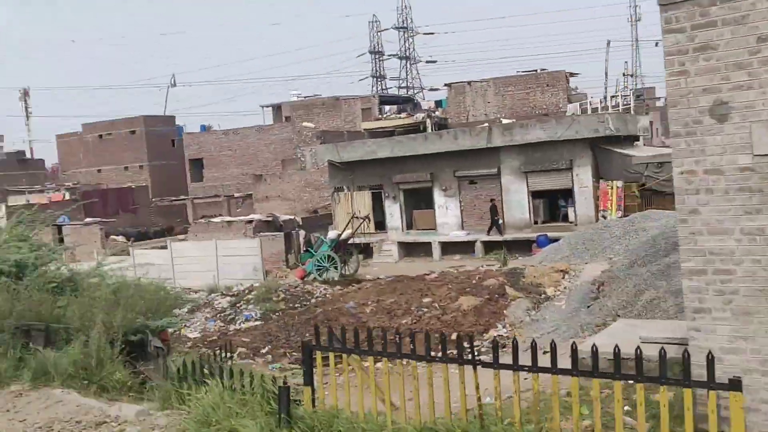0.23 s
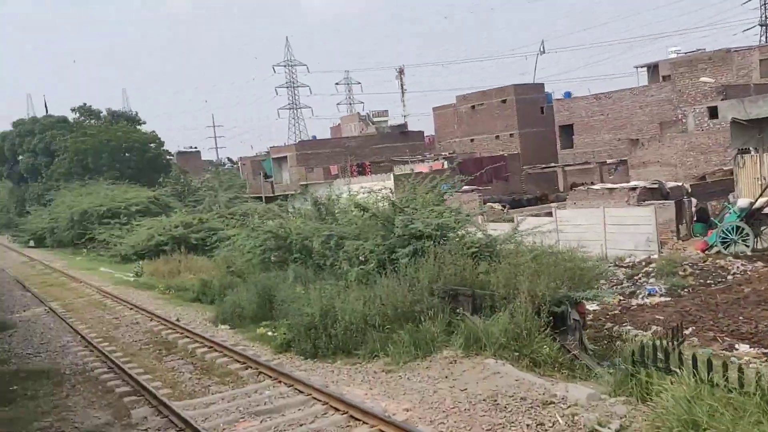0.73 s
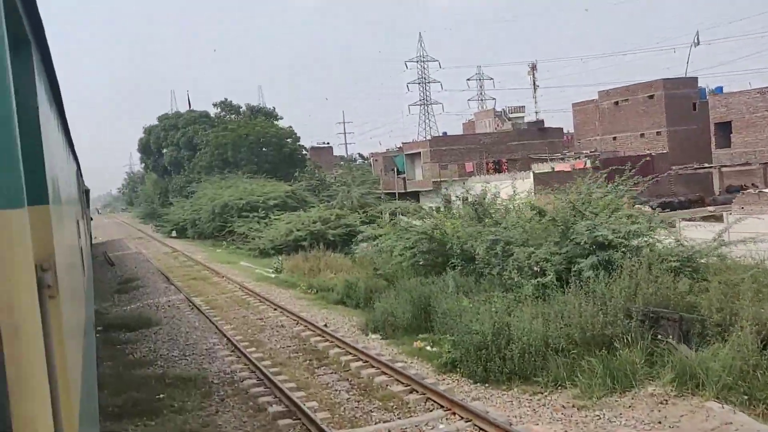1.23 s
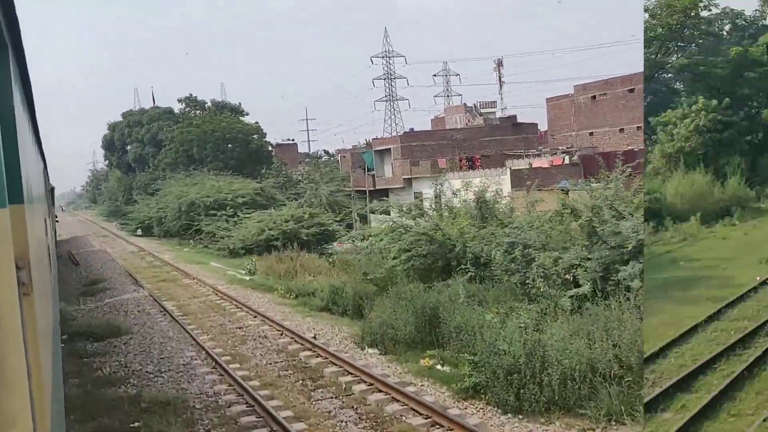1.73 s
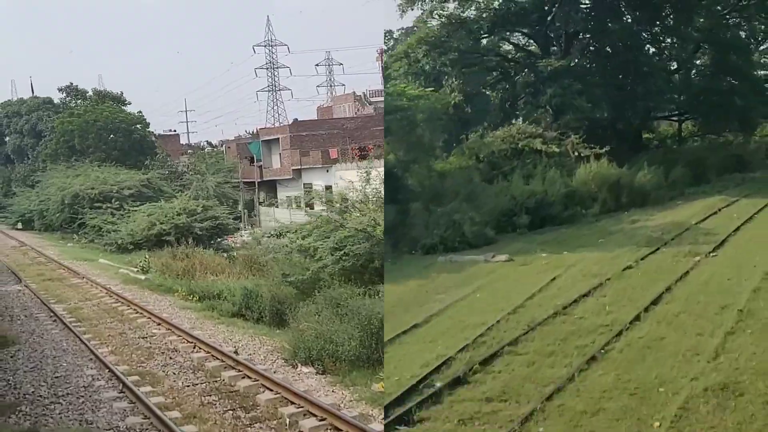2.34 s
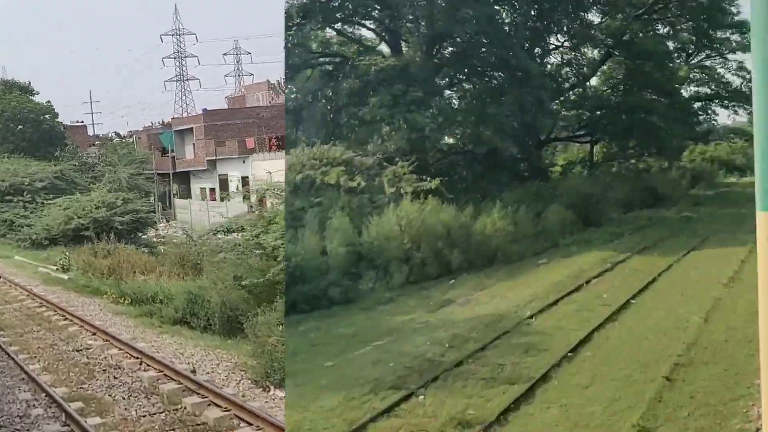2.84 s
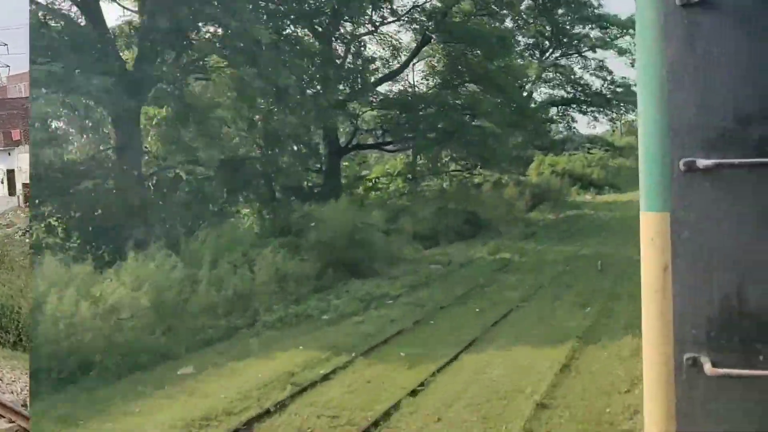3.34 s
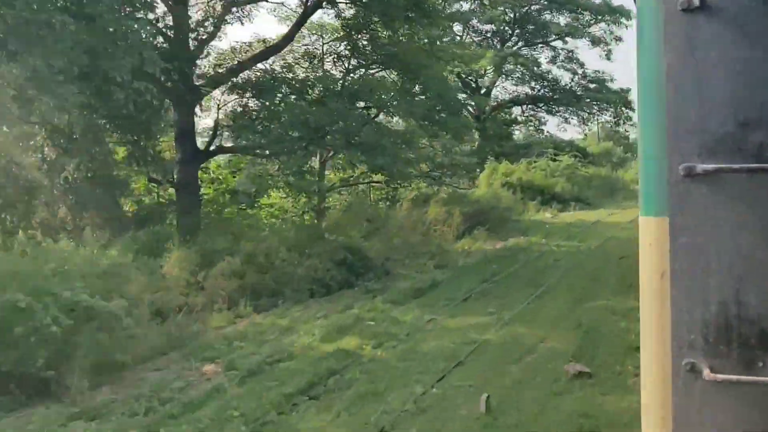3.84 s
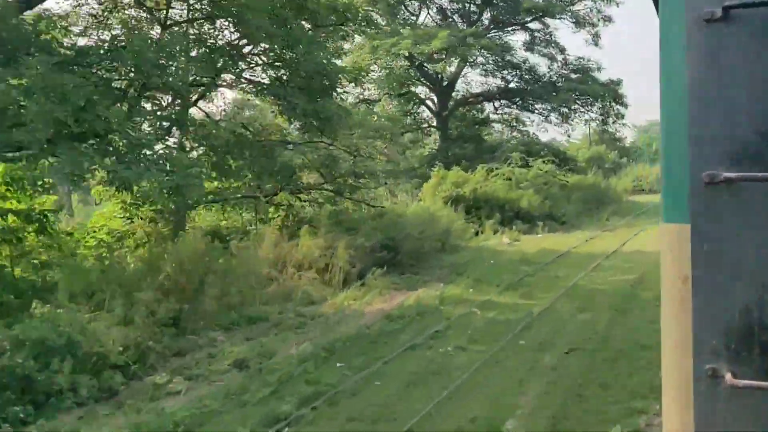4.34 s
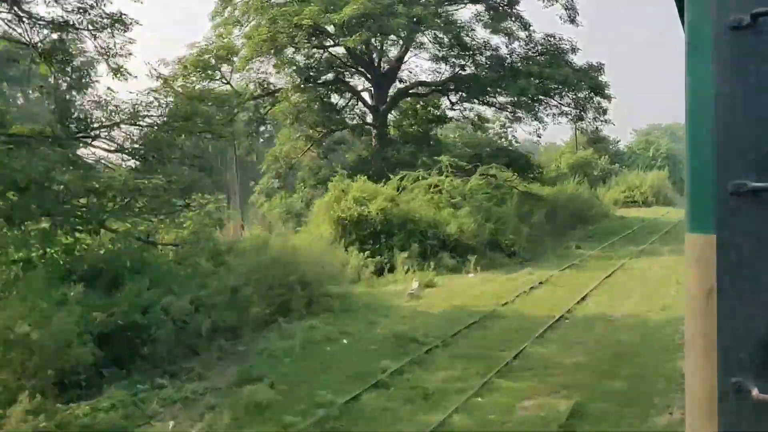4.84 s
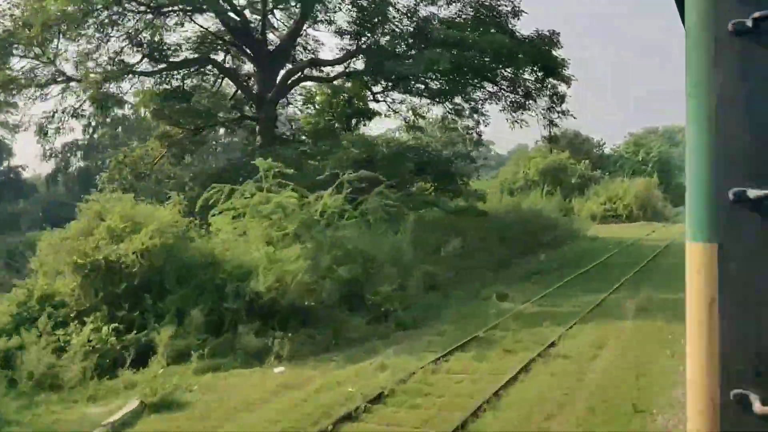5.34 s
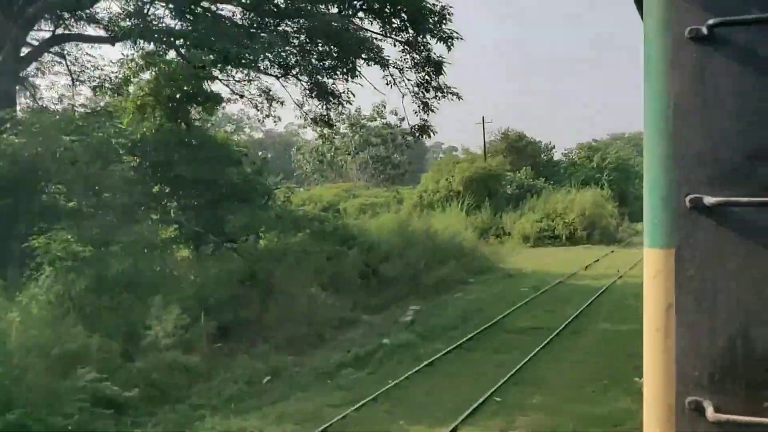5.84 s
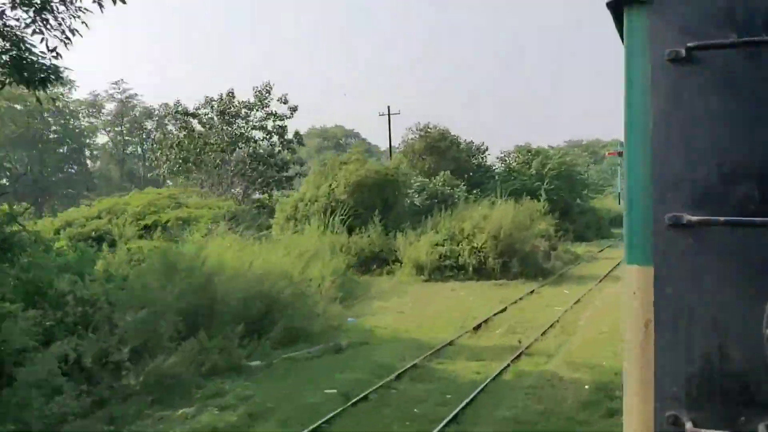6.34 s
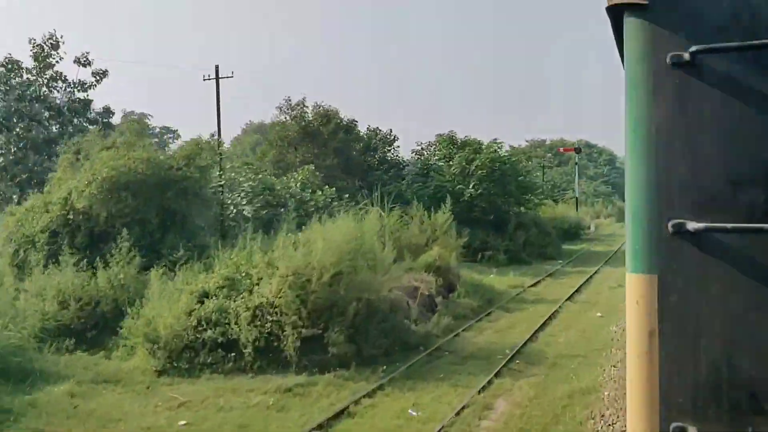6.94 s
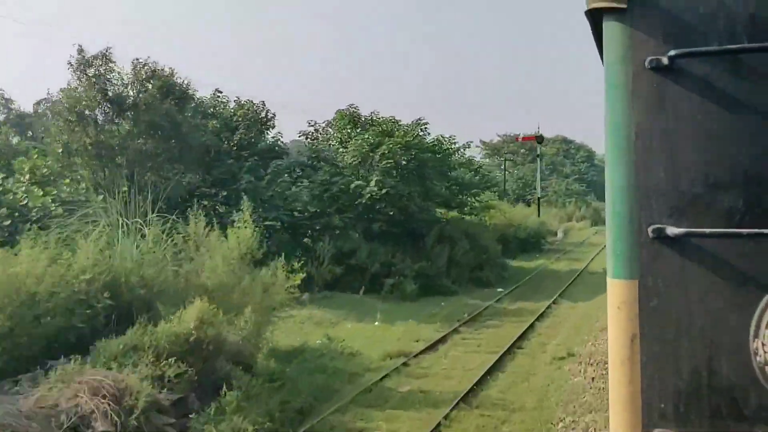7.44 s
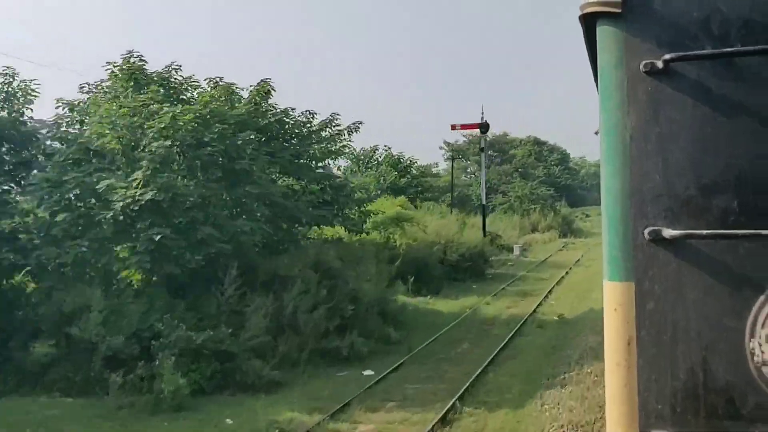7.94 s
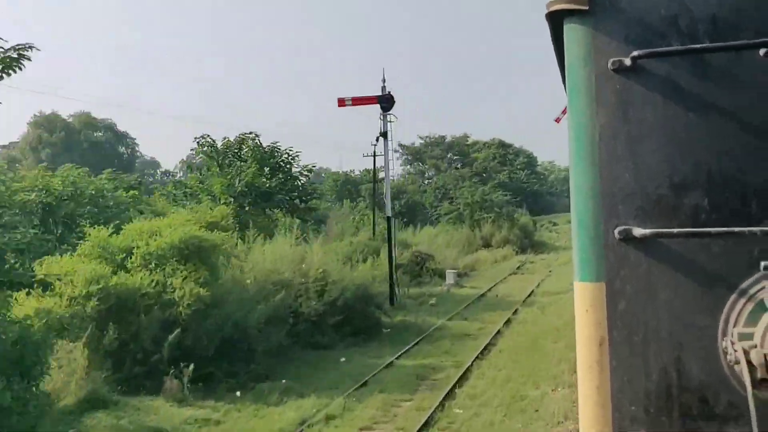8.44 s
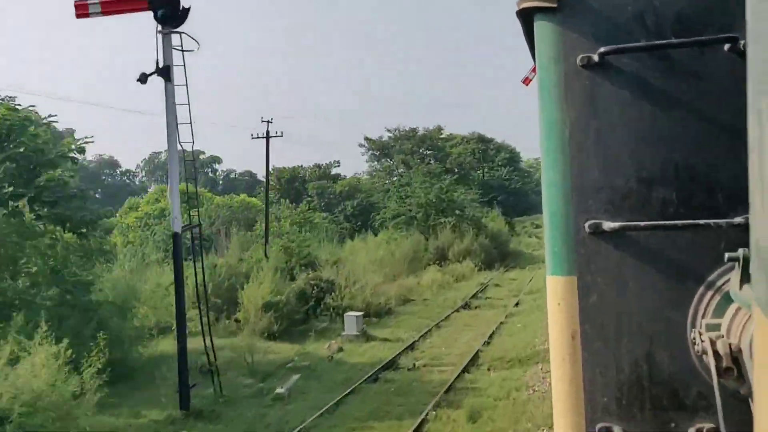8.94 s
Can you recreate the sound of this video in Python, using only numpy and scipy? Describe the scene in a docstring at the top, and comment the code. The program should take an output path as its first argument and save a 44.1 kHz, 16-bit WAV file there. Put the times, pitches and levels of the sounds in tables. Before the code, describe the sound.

Train wheels rumble steadily on rails, with brief rail squeals and a cluster of loose metal clanks between one and two seconds. Then the microphone leaves the shelter of the coach and wind batters it until the end, thumping, fluttering and crackling, strongest on the left side, while airy gusts hiss around the door edge. Outdoors, close and raw stereo.

```python
"""At the open doorway of a moving passenger coach, a microphone with two ports in the draught.
Wheels roar on the rails, the running gear clanks and a flange squeaks: noise, struck modes, fuzzy tones.
Then the slipstream takes over: separate noises rumble, flutter, slap and tick on the ports,
and a hiss follows the gusts that tear round the edge of the door."""
import sys
import numpy as np
from scipy import signal
from scipy.fft import rfft, irfft, next_fast_len
from scipy.io import wavfile
from scipy.ndimage import uniform_filter1d

SR = 44100
rng = np.random.default_rng(int(sys.argv[2]) if len(sys.argv) > 2 else 0)


def transcribe(signal):
    """Save signal, clipped to [-1, 1], as a 16-bit WAV file at the path in sys.argv[1]."""
    frames = np.atleast_2d(signal).T
    limited = np.clip(frames, -1, 1)
    pcm = np.round(limited * 32767).astype(np.int16)
    wavfile.write(sys.argv[1], SR, pcm)


N = 404838
TIME = np.arange(N) / SR


def gain_of(db):
    """Decibels to amplitude."""
    return 10 ** (np.asarray(db) / 20)


def evened(x):
    """Scales to rms 1 over all of x."""
    return x / np.sqrt(np.mean(x ** 2) + 1e-20)


def read(points, hz):
    """A spectrum joined by straight lines on a log-frequency axis."""
    f, value = np.transpose(points)
    return np.interp(np.log(hz + 1), np.log(f + 1), value)


def follow(rows, t):
    """Each column of a curve table at the times t."""
    s, *columns = np.transpose(rows)
    return np.array([np.interp(t, s, c) for c in columns])


def add(mix, s, sound):
    """Mixes a sound in at time s."""
    part = mix[:, max(round(s * SR), 0):][:, :sound.shape[-1]]
    part += sound[..., :part.shape[1]]


def coloured(x, points):
    """Filters by a spectrum."""
    size = next_fast_len(x.shape[-1] + 2048)
    gain = gain_of(read(points, np.fft.rfftfreq(size, 1 / SR)))
    return irfft(rfft(x, size) * gain, size)[..., :x.shape[-1]]


def noise(points, size=N):
    """Two unrelated noises of one colour, together of rms 1."""
    return evened(coloured(rng.standard_normal((2, size)), points))


def wander(rate_hz, t=TIME):
    """Two smooth random curves at the times t, cut from 10 s of rms 1, that move mostly below the rate."""
    grid = np.arange(20000) / 2000
    hz = np.fft.rfftfreq(len(grid), grid[1])
    spectrum = rfft(rng.standard_normal((2, len(grid)))) * np.exp(-(hz / rate_hz) ** 2)
    curves = evened(irfft(spectrum))
    return np.array([np.interp(t, grid, c) for c in curves])


def steadied(x, size):
    """Holds the rms near 1 over stretches of size samples."""
    power = uniform_filter1d(uniform_filter1d(x ** 2, size), size)
    return x / np.sqrt(power + 1e-12)


def singing(hz, width, t=TIME):
    """A resonance driven by roughness: a fuzzy tone, rms near 1, on each port."""
    angle = 2 * np.pi * np.cumsum(hz * np.ones(len(t))) / SR
    return wander(width / 2, t) * np.cos(angle) + wander(width / 2, t) * np.sin(angle)


# wheels rolling on the rails, before the sway and port trim: (time [s], level [dB])
ROLLING = [(0, -23.5), (.3, -22.5), (.7, -24.5), (1.1, -22), (1.45, -22.5), (1.85, -25.5), (2.15, -27.5),
           (2.5, -28), (2.8, -34), (9.18, -29.5)]
# spectrum of the roar, before its split into direct and diffuse: (frequency [Hz], level [dB per Hz])
ROLLING_COLOUR = [(30, 13.5), (100, 13), (310, 4.5), (500, -2), (620, -1), (790, -1), (1000, -5),
                  (1300, -6), (1900, -10.5), (2800, -12), (4000, -18.5), (5200, -16), (14000, -27.5)]
# resonances that the rolling keeps humming: (frequency [Hz], width [Hz], level against the roar [dB])
DRONES = [(76.6, 14, -8), (120.1, 34, -7.5), (300, 27, -18), (1940, 150, -22.5)]


def rolling():
    """Rough wheels on rough rails: the low roar reaches both ports nearly alike, the treble from all round."""
    diffuse = coloured(noise(ROLLING_COLOUR), [(700, -6.0), (1000, 0.88)])
    direct = coloured(noise(ROLLING_COLOUR)[0], [(700, 1.5), (1000, -7.5)])
    direct += sum(gain_of(db) * singing(hz, width)[0] for hz, width, db in DRONES)
    # the direct sound reaches the right port six samples late, some 5 cm of air
    ports = np.array([direct, np.roll(direct, 6)])
    port_trim_db = np.array([[-1.1], [1.0]])
    level_db = follow(ROLLING, TIME) + 0.89 * wander(35)[0] + port_trim_db
    return (diffuse + ports) * gain_of(level_db)


# wheels singing against the rail:
# (time [s], length [s], pitch [Hz], glide [Hz], roughness [0-1], level before a 2.5 dB cut [dB])
SQUEAKS = [(0, .2, 2130, 60, .8, -39.5), (.14, .38, 2270, -130, .9, -37), (.58, .38, 5130, 60, .3, -47),
           (.75, .65, 718, -12, .5, -40), (1.325, .04, 3110, 0, .15, -40), (1.335, .1, 705, 0, .2, -31.5),
           (1.333, .1, 6290, -50, .25, -39), (1.395, .045, 3170, 0, .1, -40), (1.45, .8, 700, 15, .5, -41),
           (1.735, .04, 12600, 0, .3, -35), (1.775, .042, 8700, 0, .6, -36),
           (1.894, .04, 8720, 0, .2, -33.5), (1.915, .115, 8670, -130, .35, -36),
           (2.1, .06, 8480, 0, .3, -42), (2.262, .07, 8560, -30, .35, -40), (2.02, .6, 8560, 0, .7, -51)]
SQUEAK_WAVER, SQUEAK_WAVER_HZ = .004, 45  # the pitch trembles by this rms share, at up to about this rate


def squeaks():
    """Stick and slip sets a wheel mode singing: a gliding, trembling tone with a skirt of scraping."""
    out = np.zeros((2, N))
    for s, length, hz, glide_hz, rough, db in SQUEAKS:
        t = np.arange(0, length, 1 / SR)
        pitch = hz * (1 + SQUEAK_WAVER * wander(SQUEAK_WAVER_HZ, t)[0]) + glide_hz * t / length
        clean = evened(np.sin(2 * np.pi * np.cumsum(pitch) / SR))
        scraping = singing(pitch, 0.053 * hz, t)
        tone = np.sqrt(1 - rough) * clean + np.sqrt(rough) * scraping
        add(out, s, gain_of(db - 2.5) * tone * signal.windows.tukey(len(t), .7))
    return out


GUST_RISE_SHARE = 0.57  # a gust or eddy builds for this share of its length, then collapses


def swell(peak_s, length):
    """The power of one gust or eddy over time: it builds to 1 and collapses."""
    near = slice(*np.searchsorted(TIME, [peak_s - 2 * length, peak_s + 2 * length]))
    t, power = TIME[near] - peak_s, np.zeros(N)
    side = length * np.where(t < 0, GUST_RISE_SHARE, 1 - GUST_RISE_SHARE)
    power[near] = np.exp(-2 * (t / side) ** 2)
    return power


# gusts tearing round the door edge, before flicker and port trim: (peak time [s], length [s], level [dB])
GUSTS = [(2.879, 0.062, -34.5), (3.073, 0.056, -29), (3.73, 0.11, -27.5), (3.792, 0.033, -23),
         (4.074, 0.035, -30), (4.159, 0.021, -29), (4.6, 0.075, -29), (4.698, 0.061, -26),
         (4.798, 0.083, -30), (5.35, 0.12, -29), (5.485, 0.085, -25), (5.582, 0.083, -18),
         (5.655, .035, -23.5), (5.796, 0.11, -22), (6.04, 0.087, -28), (6.146, 0.023, -34),
         (6.25, 0.052, -28.5), (6.52, 0.05, -35), (6.6, 0.12, -25.5), (6.716, 0.12, -18.5),
         (6.83, 0.025, -35), (6.89, 0.051, -23.5), (6.947, .05, -25.5), (7.09, 0.12, -22),
         (7.26, 0.061, -29), (7.356, 0.097, -26), (7.454, .035, -31), (7.525, 0.056, -32),
         (7.678, 0.12, -27), (7.79, 0.035, -28), (7.94, 0.035, -28.5), (8.15, 0.12, -23),
         (8.24, 0.11, -24.5), (8.437, 0.17, -33.5), (8.627, 0.048, -26.5), (8.704, 0.074, -31.5),
         (8.83, 0.062, -27.5), (8.941, 0.065, -23), (9.18, 0.1, -26)]


def gusting():
    """The summed power of the gusts at the door edge."""
    return sum(gain_of(db) ** 2 * swell(s, length) for s, length, db in GUSTS)


# force of the slipstream at the doorway: (time [s], level against full force [dB])
SLIPSTREAM = [(0, -7.5), (.3, -8.5), (1.6, -9), (1.85, -18), (2.55, -13.5), (3.0, -9.5), (3.45, -7.5),
              (3.8, -0.5), (4.35, -1), (4.95, 0.5), (5.7, -1.5), (6.3, -2.5), (6.7, 1.5), (7.1, -1),
              (7.7, -1), (8.4, 0.5), (9.0, -1), (9.18, -0.5)]
VEER_HALF_DB = -31  # a gust this strong turns the flow halfway from the left port to the right


def on_ports(ports, gusts):
    """Wind level in dB on each port: it follows the slipstream, and gusts turn it from left to right."""
    straight_db, veered_db = np.transpose(ports)[:, :, None]
    veer = gusts / (gusts + gain_of(VEER_HALF_DB) ** 2)
    return follow(SLIPSTREAM, TIME) + straight_db + veered_db * veer


def topped_up(db, power):
    """A level in dB with further power on top."""
    return 10 * np.log10(gain_of(db) ** 2 + power)


def eddy_power(rows):
    """The power that a table of eddies brings to each port."""
    rows = np.array(rows)
    return gain_of(rows[:, 2:].T) ** 2 @ np.array([swell(s, length) for s, length in rows[:, :2]])


# spectrum of the large eddies: (frequency [Hz], level [dB per Hz])
RUMBLE_COLOUR = [(8, -12), (25, 4.5), (50, -0.5), (90, -1), (135, -4.5), (220, -6), (330, -11),
                 (500, -24.5), (900, -33.5), (2000, -82)]
# rumble at full force, left port then right: (level with the flow straight [dB], change when it veers [dB])
RUMBLE_PORTS = [(-10, -2.5), (-18.5, 0.5)]
# big eddies that thump a port: (peak time [s], length [s], left level [dB], right level [dB])
BUFFETS = [(.25, 0.093, -16, -18), (.55, 0.25, -18.5, -14), (1.24, 0.084, -22, -28), (4.42, 0.18, -19, -18),
           (4.82, 0.089, -11, -11), (5.0, 0.089, -8, -15), (7.0, 0.1, -19, -26), (7.9, 0.24, -31, -18),
           (8.84, 0.37, -18, -23)]
RUMBLE_SWAY_DB, RUMBLE_SWAY_HZ = 1.0, 5.1


def rumble(gusts):
    """Large eddies press on each port separately."""
    wind_db = on_ports(RUMBLE_PORTS, gusts) + RUMBLE_SWAY_DB * wander(RUMBLE_SWAY_HZ)
    level_db = topped_up(wind_db, eddy_power(BUFFETS))
    return steadied(noise(RUMBLE_COLOUR), size=3600) * gain_of(level_db)


LULL_DB, LULL_S = -5.5, .02  # depth and length of one lull


def lulls():
    """How far the flutter sinks, in dB, around the start of each slap; deepest just before it."""
    return LULL_DB * sum(swell(s - LULL_S / 4, LULL_S) for s, length, db in SLAPS)


# the flow lifts off one port or both for a moment; a positive change is a rise:
# (peak time [s], length [s], left change [dB], right change [dB])
STALLS = [(2.897, 0.15, -5, -14), (3.14, 0.06, 3, -10), (3.644, 0.045, -11, -2), (4.15, 0.047, -15, -17),
          (4.406, 0.023, -4, -11), (4.718, .08, -7, -6), (5.285, 0.051, -8, 0), (5.497, 0.034, -7, -8),
          (6.23, .06, -6, 2), (6.31, .04, 3, -12), (6.846, 0.089, -12, -10), (7.07, 0.058, -10, -6),
          (7.42, 0.13, -1.5, -17), (7.903, 0.062, -22, 2), (8.11, 0.047, -14, 3), (8.659, 0.021, -11, -9),
          (8.799, .05, -5, -16), (9.035, .11, 0.5, -20)]


def stalls():
    """How the flutter changes on each port, in dB, while the flow lifts off."""
    rows = np.array(STALLS)
    return rows[:, 2:].T @ np.array([swell(s, length) for s, length in rows[:, :2]])


# spectrum of the small eddies at middling speed: (frequency [Hz], level [dB per Hz])
FLUTTER_COLOUR = [(60, -0.5), (200, -2.5), (350, 4.5), (600, -1), (1000, -6.5), (1500, -12.5),
                  (2200, -22.5), (4000, -32.5), (9000, -99)]
# flutter at full force, before a 1.55 dB lift, left port then right:
# (level with the flow straight [dB], change when it veers [dB])
FLUTTER_PORTS = [(-16.5, -4.5), (-27.5, 4)]
# how far the microphone is out of the coach's lee, in the rough air: (time [s], level against fully out [dB])
EXPOSURE = [(0, -17), (1.95, -14), (2.3, -1), (2.9, 2), (3.2, 3), (3.9, -1.5), (4.9, -1), (5.75, 3),
            (6.5, -1), (7.1, 0.5), (7.8, 0.5), (9.18, -0.5)]
# flurries of small eddies that rattle a port, before lulls, stalls and the lift:
# (peak time [s], length [s], left level [dB], right level [dB])
FLURRIES = [(3.0, 0.054, -25, -22.5), (3.07, .05, -31, -24), (3.25, 0.17, -26, -23.5),
            (3.47, 0.25, -22, -26), (4.02, 0.019, -25, -17), (4.36, 0.085, -13, -23), (5.04, .06, -20, -25),
            (5.17, 0.055, -15, -28), (5.43, 0.085, -16, -20.5), (5.57, 0.15, -20, -13.5),
            (5.66, .04, -20, -21), (5.8, 0.085, -15.5, -14.5), (5.9, 0.049, -27, -15.5),
            (6.04, 0.12, -17, -21.5), (6.18, 0.046, -24, -18.5), (6.58, 0.45, -21, -20),
            (6.91, 0.029, -21, -21), (7.285, 0.024, -30, -15.5), (7.85, 0.078, -25, -18),
            (8.08, 0.036, -13, -15), (8.41, 0.029, -12.5, -23), (8.61, 0.079, -19, -30),
            (9.12, 0.11, -18.5, -29)]
FLUTTER_SWAY_DB, FLUTTER_SWAY_HZ = 1.1, 27


def flutter(gusts):
    """Small eddies come in quick bursts; a faster one is louder and brighter, and the hardest crackle."""
    wind_db = on_ports(FLUTTER_PORTS, gusts) + follow(EXPOSURE, TIME)
    wind_db = wind_db + FLUTTER_SWAY_DB * wander(FLUTTER_SWAY_HZ)
    level_db = topped_up(wind_db, eddy_power(FLURRIES)) + lulls() + stalls()

    hz, t, z = signal.stft(rng.standard_normal((2, N)), SR, nperseg=256, noverlap=192)
    burst_db = 1.1 * wander(37, t) + 3.4 * wander(240, t)
    force_db = np.array([np.interp(t, TIME, port) for port in level_db]) + burst_db
    # speed slides the spectrum up; each frame is then evened over its low bands
    speed = np.exp(0.018 * (force_db + 14.0))
    shape = gain_of(read(FLUTTER_COLOUR, hz[:, None] / speed[:, None]))
    shape /= np.linalg.norm(shape[:, 2:8], axis=1, keepdims=True)
    bursts = z * shape * gain_of(burst_db)[:, None]
    eddies = signal.istft(bursts, SR, nperseg=256, noverlap=192)[1][:, :N]

    pressure = steadied(eddies, size=1500) * gain_of(level_db + 1.55)
    # squared pressure: only hard bursts crackle
    crackle = pressure ** 2 * noise([(800, -4.5), (1800, -12), (4000, -40), (14000, -9.5)])
    return pressure + crackle


SLAP_RISE_S, SLAP_FALL_S = .0007, .005  # time constants of a puff's start and end


def puff(colour, length):
    """One eddy on a port: a sudden start, a ragged hold and a quick fall."""
    t = np.arange(4096) / SR
    envelope = (1 - np.exp(-t / SLAP_RISE_S)) * np.exp(-np.maximum(t - length, 0) / SLAP_FALL_S)
    return envelope * steadied(noise(colour, size=len(t)), size=200)


# hollow bumps of air on the right port: (time [s], length [s], level [dB])
BUMPS = [(0.031, 0.047, -13), (0.087, 0.037, -15.5)]
# spectrum of a bump: (frequency [Hz], level [dB per Hz])
BUMP_COLOUR = [(60, -11), (180, 2), (340, 2), (480, -6.5), (800, -21), (2500, -62)]
BUMP_LEE_DB = -20  # the left port is in the lee of a bump


def bumps():
    """Slower eddies bump the right port: short puffs of low-pitched noise."""
    out = np.zeros((2, N))
    for s, length, db in BUMPS:
        add(out, s, gain_of([[db + BUMP_LEE_DB], [db]]) * puff(BUMP_COLOUR, length))
    return out


# knocks of the running gear, levels before decay, the thud's also before port trim:
# (time [s], thud level [dB], thud pitch [Hz], steel ring level [dB])
CLANKS = [(0.192, -20, 800, -44), (.975, -32, 680, -21), (1.008, -32, 720, -26), (1.368, -26, 1287, -44),
          (1.387, -18, 693, -42), (1.614, -16.5, 720, -31), (1.64, -23, 456, -30), (1.716, -20.5, 890, -22),
          (1.753, -27, 787, -24), (1.836, -46, 790, -27.5), (2.033, -21.5, 746, -37),
          (3.054, -20, 893, -44)]
# modes of the loose steel fittings: (frequency [Hz], width [Hz], level [dB])
STEEL = [(1900, 150, 3), (4100, 110, -3.5), (4500, 150, -4), (5380, 200, -3), (6570, 200, -10),
         (7300, 240, 1.5), (8270, 400, 2), (8705, 200, -5), (13000, 500, 4.5)]
# spectrum of the coach body under a knock: (frequency [Hz], level [dB per Hz])
BODY = [(60, -8), (200, 18), (450, 17), (720, 6.5), (1100, 4.5), (2000, 2.5), (3500, -9.5), (9000, -35)]
# the struck part booms round its own pitch, with this share of the thud's power
THUD_T60_S, THUD_WIDTH_HZ, THUD_TONE_SHARE = 0.17, 230, 0.31
CLASH_T60_S, RING_T60_S, RING_DB = 0.1, .42, -5  # the steel clashes briefly, then rings on more softly


def clanks():
    """Each knock thuds through the coach body and sets its loose steel fittings jangling."""
    out, t = np.zeros((2, N)), np.arange(SR // 4) / SR
    hz = np.arange(100, 16000, 25)
    resonances = sum(gain_of(db) ** 2 / (1 + (2 * (hz - f) / width) ** 2) for f, width, db in STEEL)
    # between its modes the steel still gives a broad clash
    steel = np.transpose([hz, 10 * np.log10(resonances + 0.11 * hz / (hz + 3000))])
    decay = np.hypot(gain_of(-60 * t / CLASH_T60_S), gain_of(RING_DB - 60 * t / RING_T60_S))
    port_trim_db = np.array([[0.3], [2.2]])
    for s, thud_db, thud_hz, ring_db in CLANKS:
        boom = singing(thud_hz, THUD_WIDTH_HZ, t)
        body = np.sqrt(1 - THUD_TONE_SHARE) * noise(BODY, size=len(t)) + np.sqrt(THUD_TONE_SHARE) * boom
        # each port also hears some of the other's thud
        thud = steadied(body + 0.31 * body[::-1], size=500)
        thud *= gain_of(thud_db + port_trim_db - 60 * t / THUD_T60_S) * (1 - np.exp(-t / 0.0022))
        jangle = noise(steel, size=len(t)) * gain_of(ring_db) * decay * (1 - np.exp(-t / 0.00083))
        add(out, s, thud + jangle)
    return out


# spectrum of the hiss: (frequency [Hz], level [dB per Hz])
RUSH_COLOUR = [(150, -6), (500, 10), (900, 8), (1400, 5), (2300, 6), (3000, 1.5), (4000, -1.5), (6000, 2.5),
               (9000, -4.5), (15000, -1)]
# hiss at the door edge between gusts, before flicker and port trim: (time [s], level [dB])
EDGE_HISS = [(2.3, -49), (2.9, -45), (3.55, -33), (4.0, -34.5), (5.2, -36), (5.55, -33), (5.95, -32),
             (6.35, -33.5), (6.8, -28.5), (7.2, -33), (7.6, -30.5), (8.55, -37), (8.75, -33), (9.05, -35.5)]
STRAY_GUST_DB, STRAY_GUST_HZ = 1.0, 24  # the small gusts in between: rms depth and rate


def rush(gusts):
    """Air tears past the door edge: a gusting hiss in both ports; the strongest gusts add a fine fizz."""
    flicker_db = 1.1 * wander(50)[0] + .9 * wander(35)
    steady_db = follow(EDGE_HISS, TIME) + STRAY_GUST_DB * wander(STRAY_GUST_HZ)[0]
    level_db = topped_up(steady_db, gusts) + flicker_db
    port_trim_db = np.array([[2.6], [1.2]])
    hiss = noise(RUSH_COLOUR) * gain_of(level_db + port_trim_db)
    fizz_db = np.interp(level_db, [-35, -25, -19], [-70, -41, -19])
    fizz = noise([(5000, -36), (9000, -14.0), (11500, -2.0), (15000, -13)]) * gain_of(fizz_db)
    return hiss + 0.046 * hiss[::-1] + fizz


# single eddies slapping the left port: (time [s], length [s], level [dB])
SLAPS = [(3.147, .018, -21), (3.212, 0.037, -16.5), (3.277, 0.018, -14), (3.362, 0.013, -16.5),
         (3.413, 0.022, -15.5), (3.664, 0.038, -14), (3.755, 0.021, -14.5), (3.888, 0.041, -15),
         (4.001, 0.016, -8), (4.063, 0.024, -12.5), (4.122, 0.014, -12.5), (4.195, 0.03, -9.5),
         (4.252, 0.017, -11.5), (4.284, 0.035, -13.5), (4.326, 0.0061, -9.5), (4.354, 0.019, -12.5),
         (4.458, 0.027, -10.5), (4.51, 0.025, -9.5), (4.906, 0.012, -8.5), (4.941, 0.014, -12.5),
         (5.066, 0.03, -13), (5.161, 0.031, -16), (5.527, 0.039, -11.5), (5.644, 0.015, -16),
         (5.738, 0.012, -8.5), (5.889, 0.026, -17), (5.943, 0.011, -14), (6.312, 0.02, -13),
         (6.342, 0.024, -10), (6.472, 0.011, -8.5), (6.624, 0.019, -14), (6.826, 0.02, -10.5),
         (7.161, 0.011, -9), (7.492, .014, -15), (7.752, 0.008, -10), (7.954, 0.018, -11),
         (7.996, 0.039, -9.5), (8.325, 0.021, -10), (8.358, 0.057, -12.5), (8.503, 0.02, -15),
         (8.544, 0.011, -7.5), (8.57, 0.01, -7.5), (8.678, 0.011, -16), (8.765, .012, -13),
         (9.054, 0.019, -12.5), (9.086, 0.02, -15)]
# spectrum of a slap of -14 dB: (frequency [Hz], level [dB per Hz])
SLAP_COLOUR = [(80, -4), (400, 4.5), (1000, -4), (1600, -11), (2500, -22), (5000, -54), (12000, -16)]
SLAP_BRIGHTER_PER_DB = 0.03  # a harder slap is brighter: its spectrum slides up by this share for each dB
SLAP_LEE_DB = -28  # the right port is in the lee of a slap or tick


def slaps():
    """Sharp eddies clatter on the left port: sudden puffs of noise, brighter when harder."""
    out = np.zeros((2, N))
    for s, length, db in SLAPS:
        speed = np.exp(SLAP_BRIGHTER_PER_DB * (db + 14.0))
        colour = [(hz * speed, level) for hz, level in SLAP_COLOUR]
        add(out, s, gain_of([[db], [db + SLAP_LEE_DB]]) * puff(colour, length))
    return out


# sharp knocks on the left port: (time [s], level before the snap and tail factors [dB])
TICKS = [(4.001, -14), (4.013, -17), (4.329, -6), (4.333, -13), (4.357, -7), (4.511, -15), (4.947, -18),
         (5.652, -14), (5.896, -11), (5.916, -10), (6.869, -16), (8.36, -7), (8.406, -15), (8.548, -17),
         (8.72, -15)]
# spectrum of a tick: (frequency [Hz], level [dB per Hz])
TICK_COLOUR = [(150, -6), (450, 3), (1000, 0), (1750, -1), (2700, -4), (4500, -17), (12000, -28)]
TICK_T60_S, TICK_SNAP = 0.032, 2.5  # decay of the ragged tail; peak of the first pressure jump


def ticks():
    """Sharp knocks on the left port: a jump of pressure, up or down, and a short ragged tail."""
    out, t = np.zeros((2, N)), np.arange(-256, 2048) / SR
    snap = coloured(1. * (t == 0), TICK_COLOUR)
    decay = (t >= 0) * gain_of(-4.5 - 60 * abs(t) / TICK_T60_S)
    for s, db in TICKS:
        tail = steadied(noise(TICK_COLOUR, size=len(t)), size=100) * decay
        knock = tail + rng.choice([-1, 1]) * TICK_SNAP * snap / snap.max()
        add(out, s + t[0], knock * gain_of([[db], [db + SLAP_LEE_DB]]))
    return out


PORT_LEAK_DB = -26.5  # each port hears this much of the wind on the other


def scene():
    """Train and wind together."""
    gusts = gusting()
    buffeting = rumble(gusts) + flutter(gusts) + bumps() + slaps() + ticks()
    wind = buffeting + gain_of(PORT_LEAK_DB) * buffeting[::-1] + rush(gusts)
    return rolling() + squeaks() + clanks() + wind


LIMIT_DB, LIMIT_S = -7, 0.022  # rms ceiling of each port, and the averaging time, applied twice


def limited(x):
    """A limiter turns each port down, softly, as its power nears and passes the limit."""
    size = max(int(LIMIT_S * SR), 2)
    power = uniform_filter1d(uniform_filter1d(x ** 2, size), size)
    return x / (1 + (power / gain_of(LIMIT_DB) ** 2) ** 4) ** (1 / 8)


# colour of the two microphone ports: (frequency [Hz], level [dB])
LEFT_PORT = [(1000, 1.5), (1900, 0), (3000, -0.5), (4200, 2.5), (5200, 4.5), (6200, 9.5), (7000, 2),
             (8000, -5.5), (9000, -19), (10000, -22.5), (15000, -43)]
RIGHT_PORT = [(1000, 1), (1600, 3), (1900, 4), (2300, 3.5), (2800, -1), (4200, 2.5), (5700, 1), (7500, -4),
              (9000, 2), (9600, -3.5), (10300, -26.5), (13000, -15.5), (15500, -29)]
EDGE_HZ = 15600  # top of the microphone's band


def record(dry):
    """Each port colours the sound; a limiter holds it, the highest peaks are rounded, the band is cut."""
    x = np.array([coloured(dry[0], LEFT_PORT), coloured(dry[1], RIGHT_PORT)])
    x = limited(x)
    ceiling = .95
    x = x / (1 + (x / ceiling) ** 6) ** (1 / 6)
    band = signal.firwin(511, EDGE_HZ, window=("kaiser", 9), fs=SR)
    return signal.oaconvolve(x, band[None], "same")


dry = scene()
out = record(dry)
transcribe(out)
```